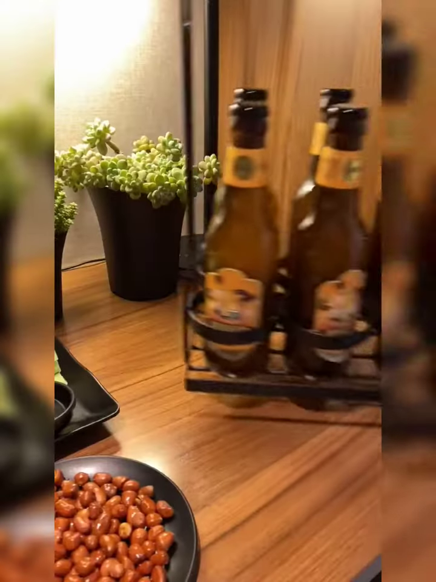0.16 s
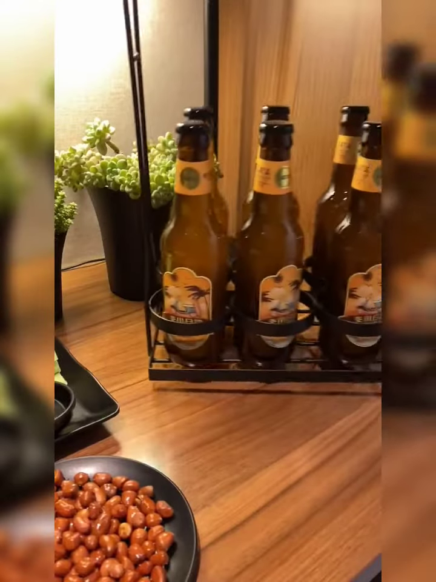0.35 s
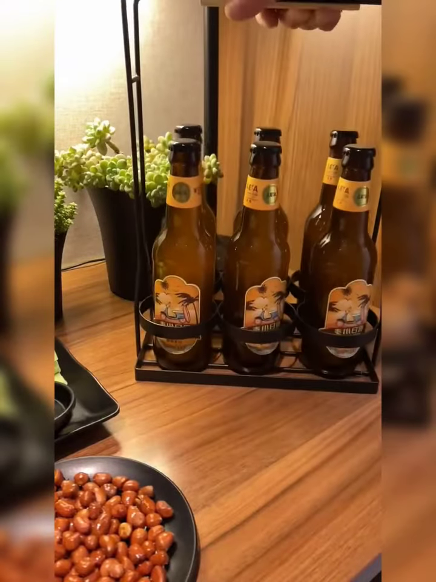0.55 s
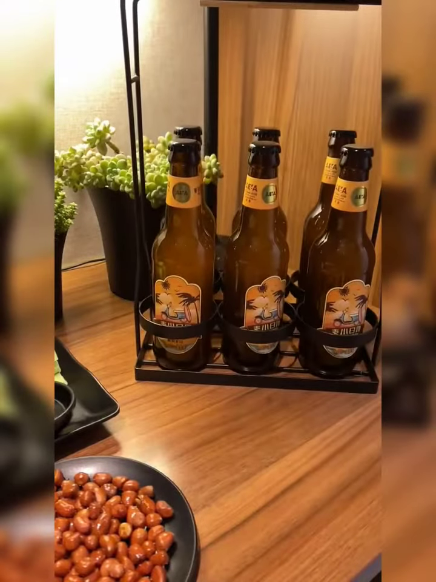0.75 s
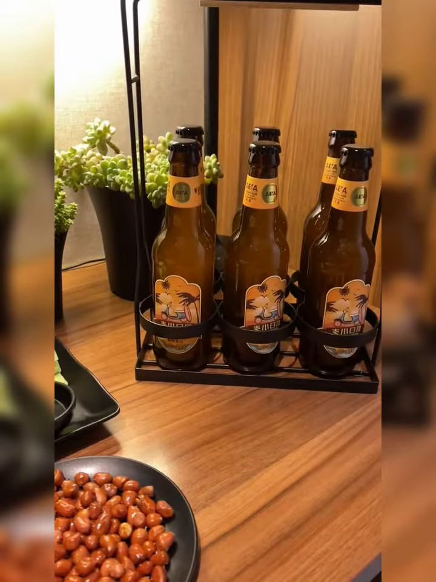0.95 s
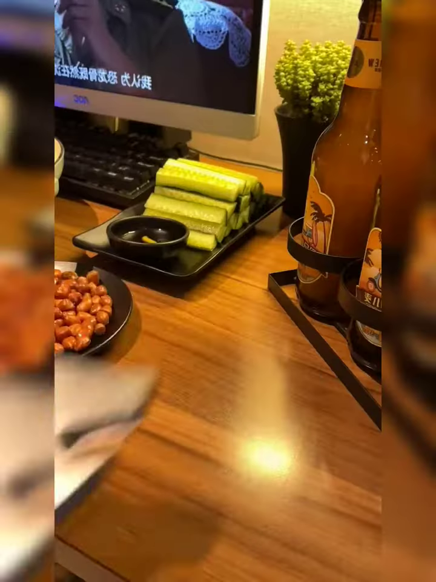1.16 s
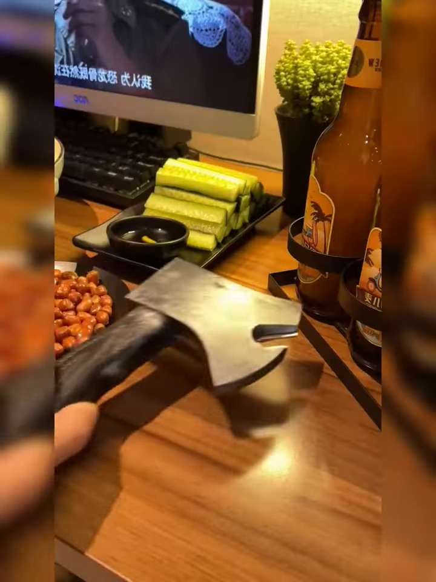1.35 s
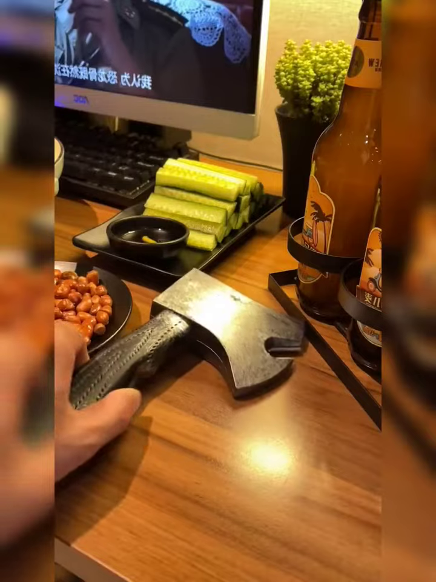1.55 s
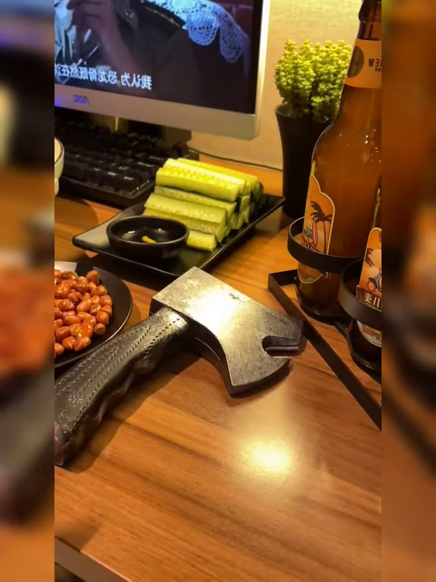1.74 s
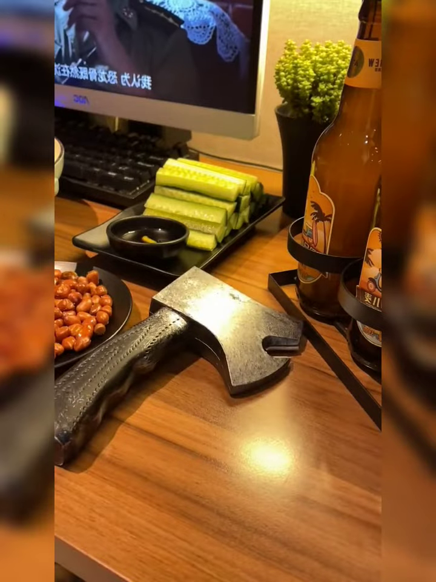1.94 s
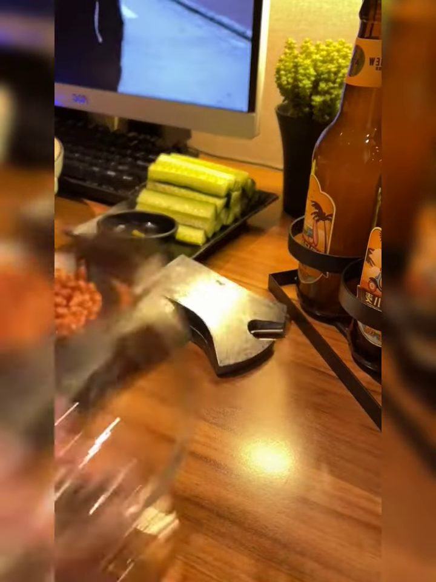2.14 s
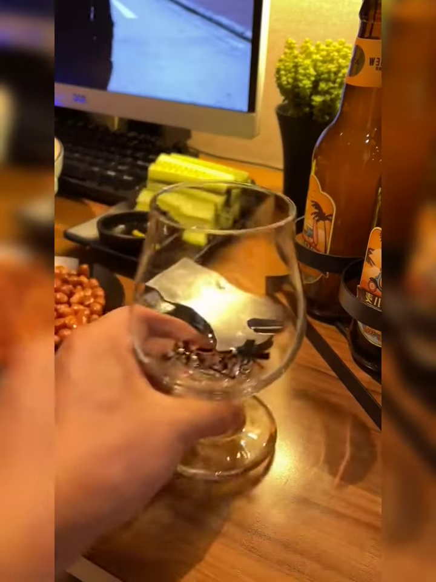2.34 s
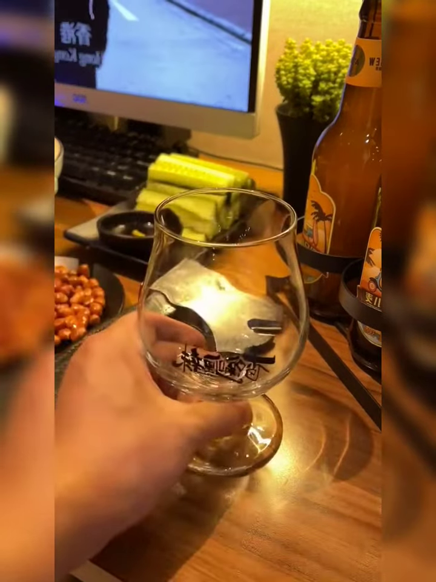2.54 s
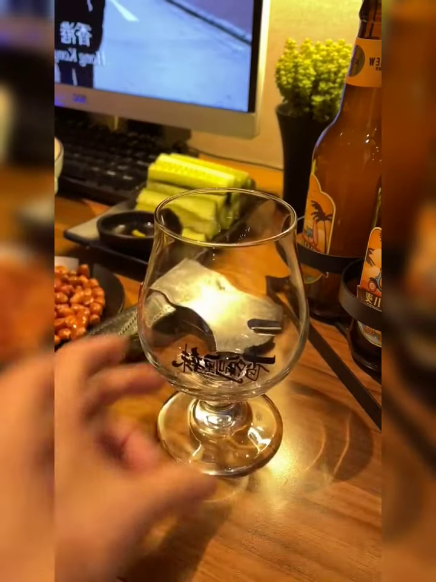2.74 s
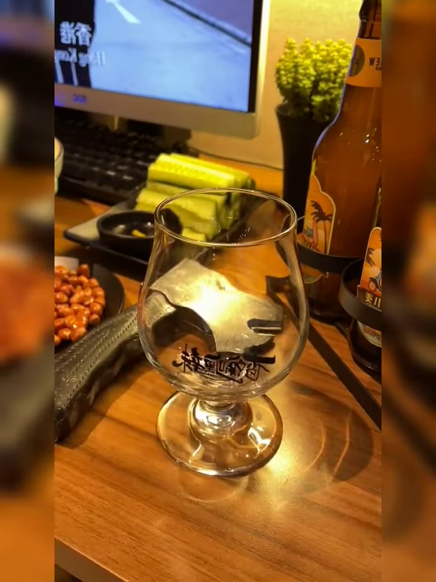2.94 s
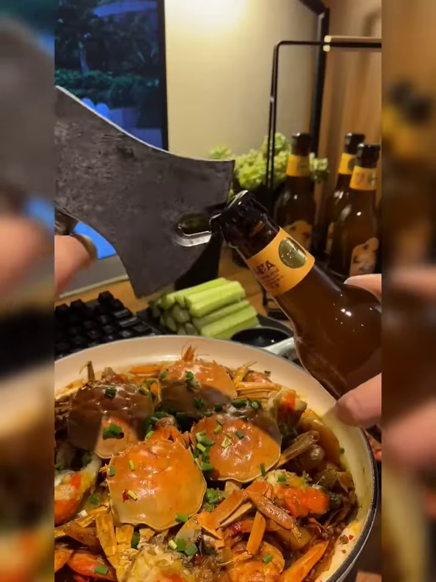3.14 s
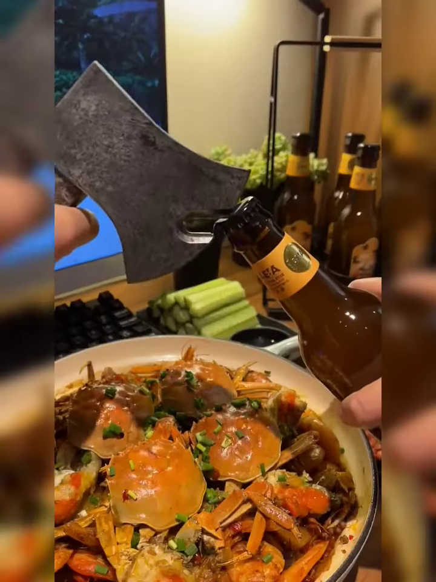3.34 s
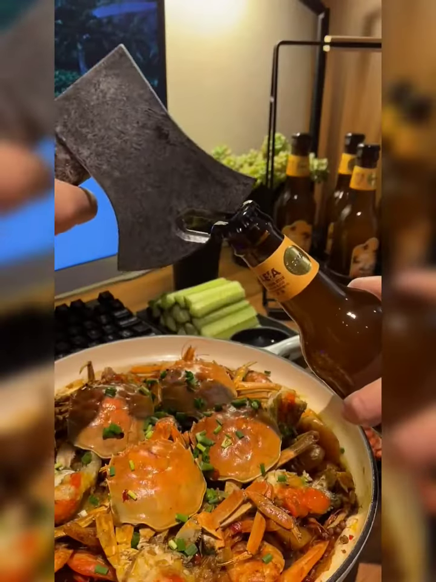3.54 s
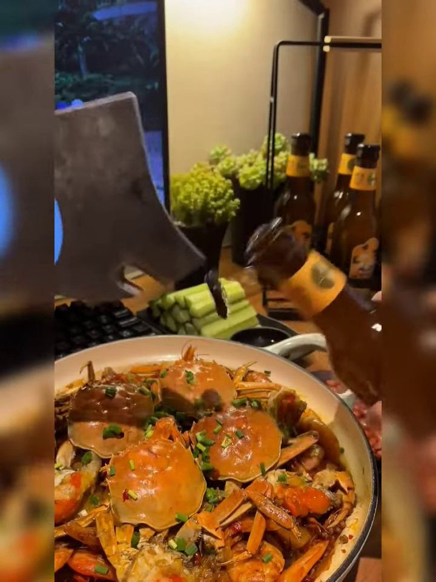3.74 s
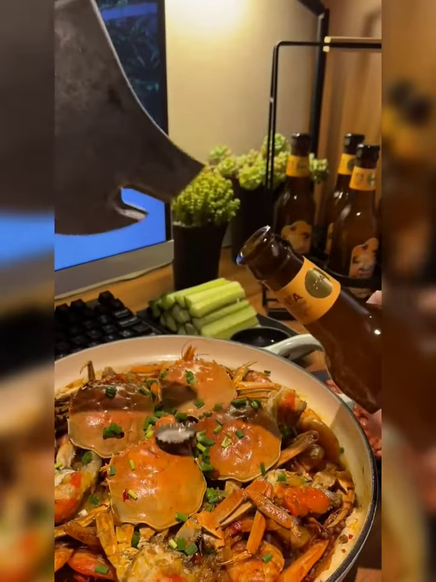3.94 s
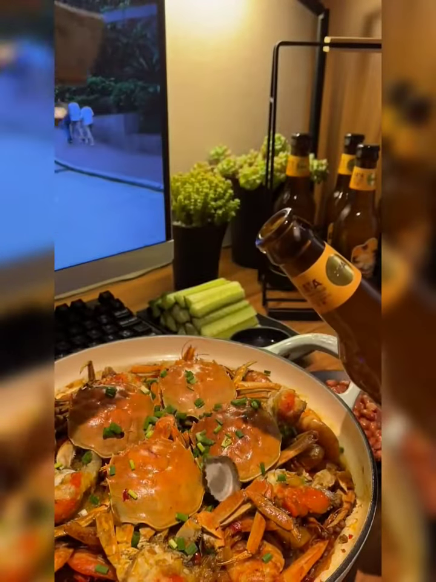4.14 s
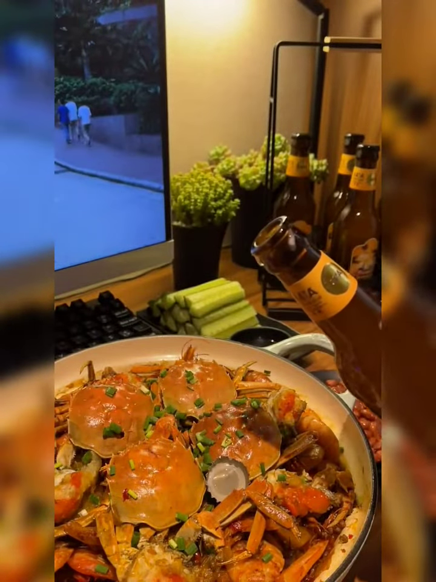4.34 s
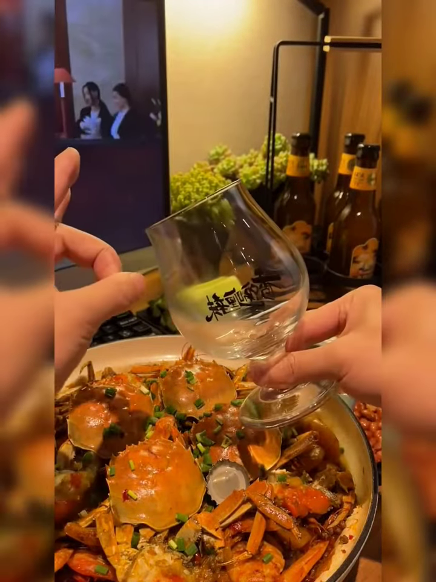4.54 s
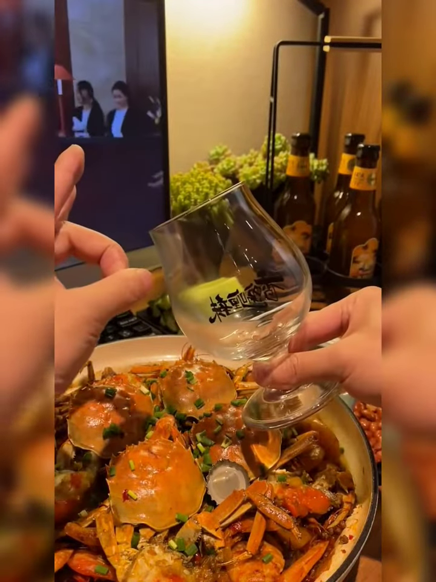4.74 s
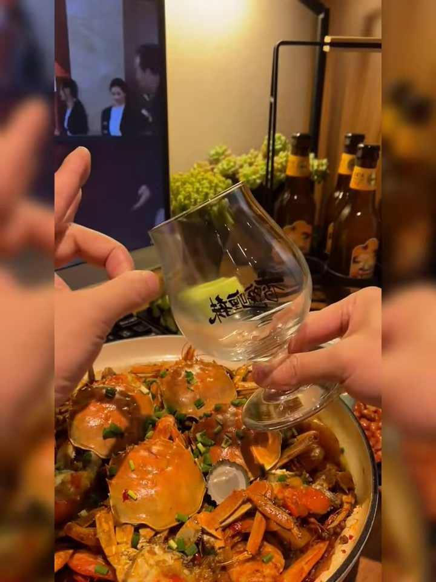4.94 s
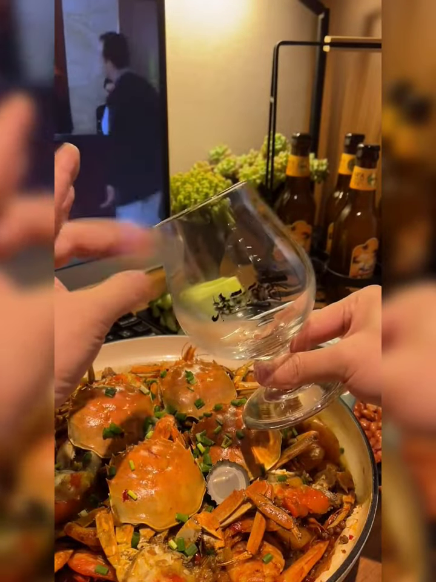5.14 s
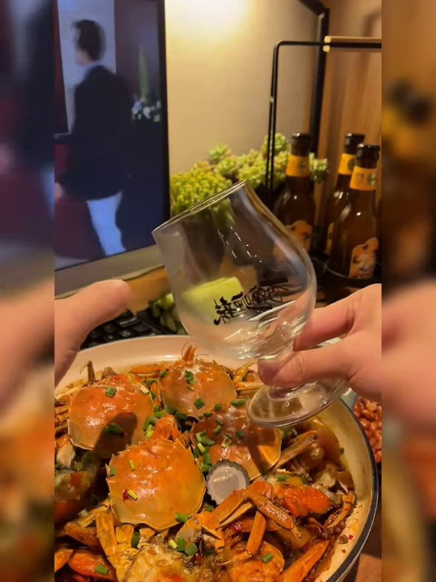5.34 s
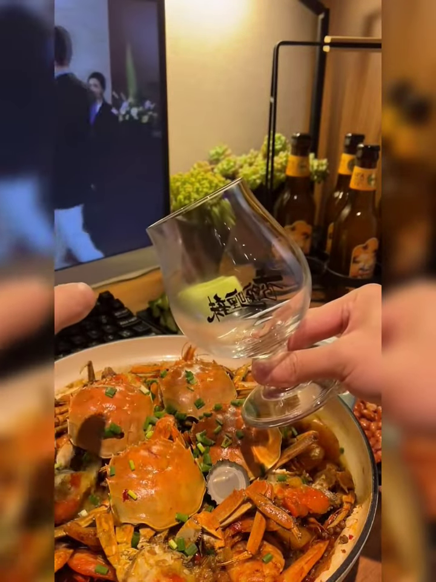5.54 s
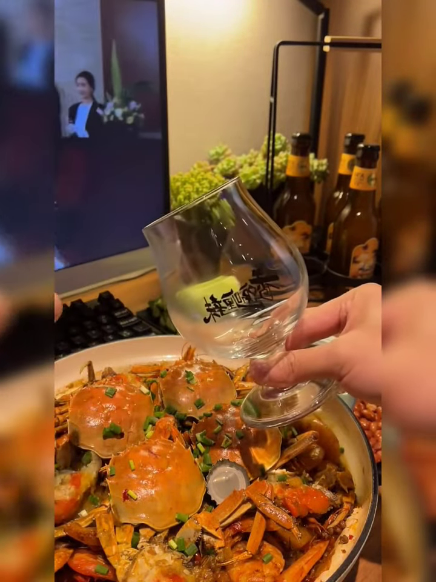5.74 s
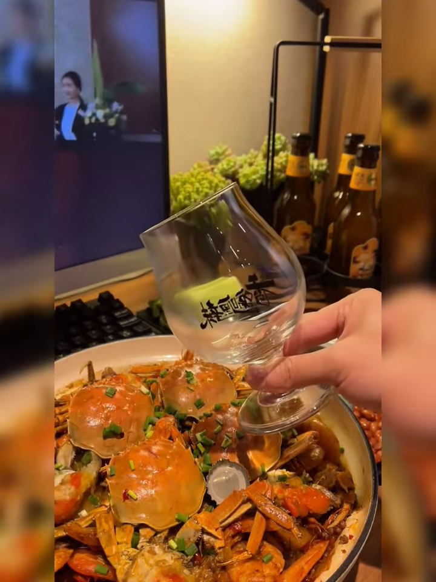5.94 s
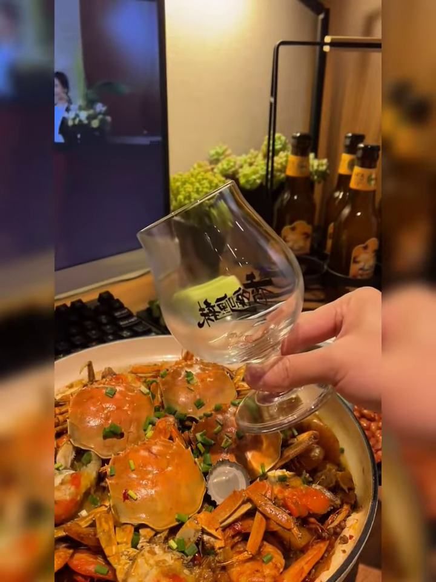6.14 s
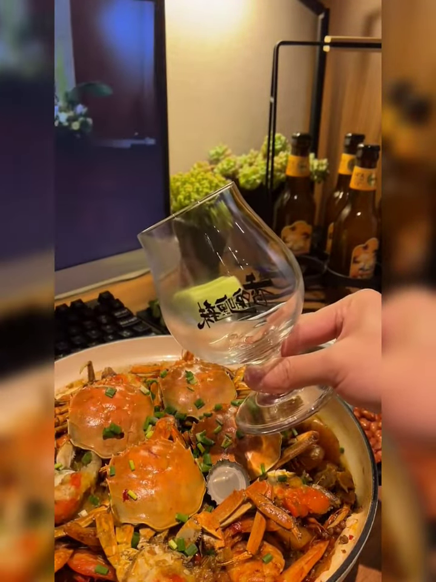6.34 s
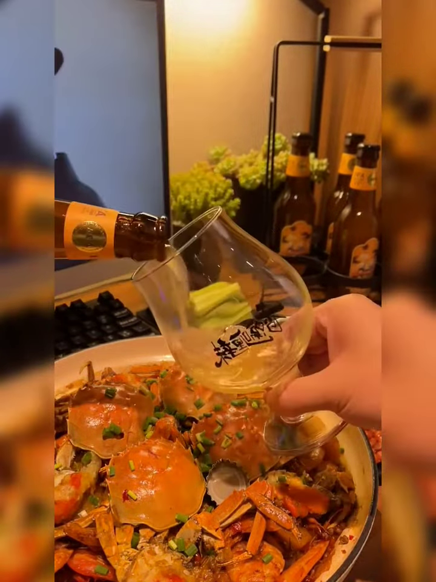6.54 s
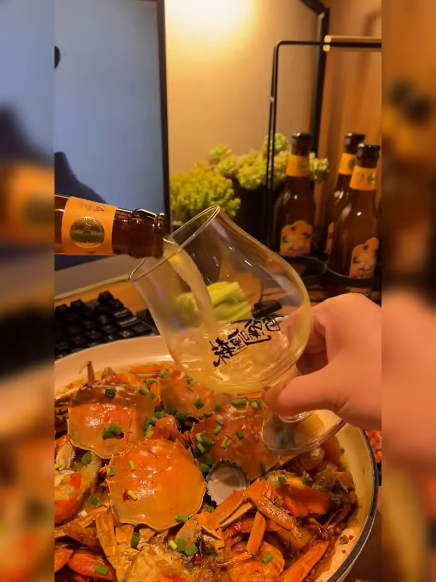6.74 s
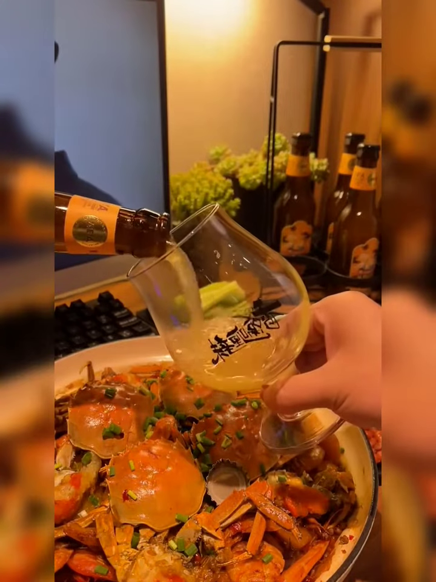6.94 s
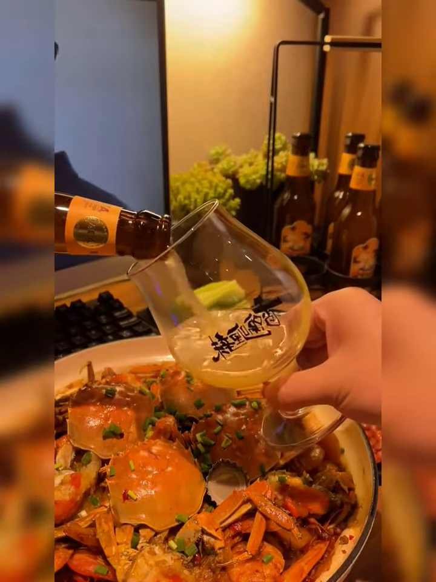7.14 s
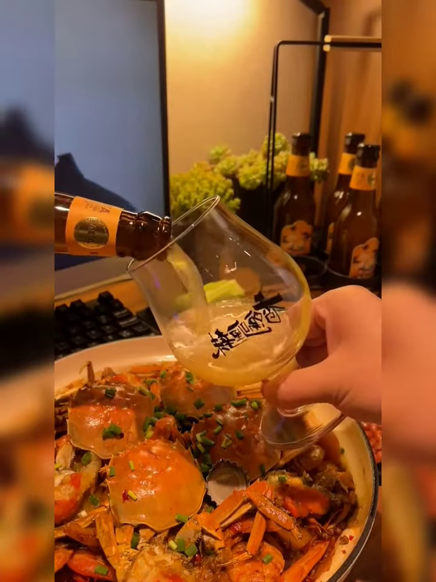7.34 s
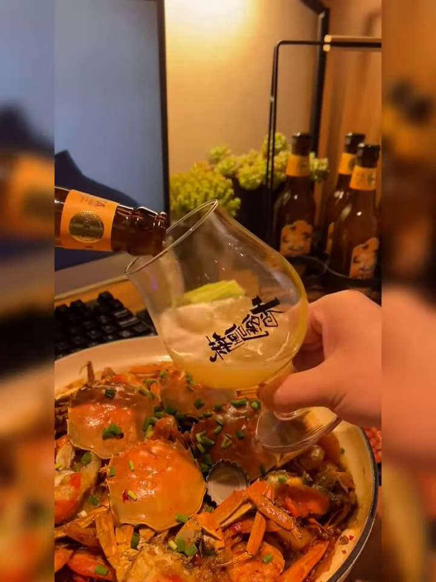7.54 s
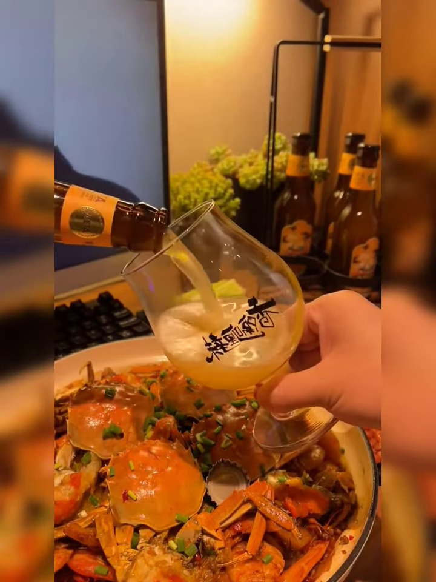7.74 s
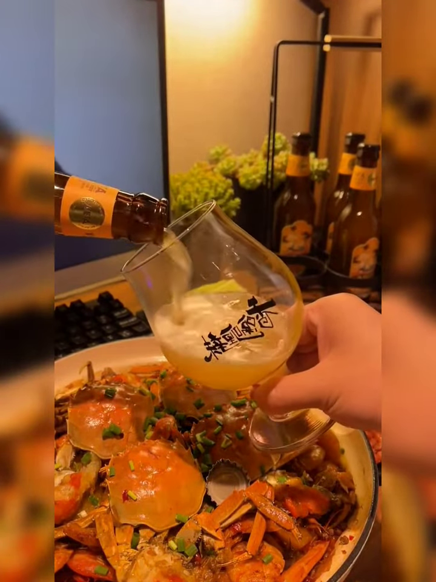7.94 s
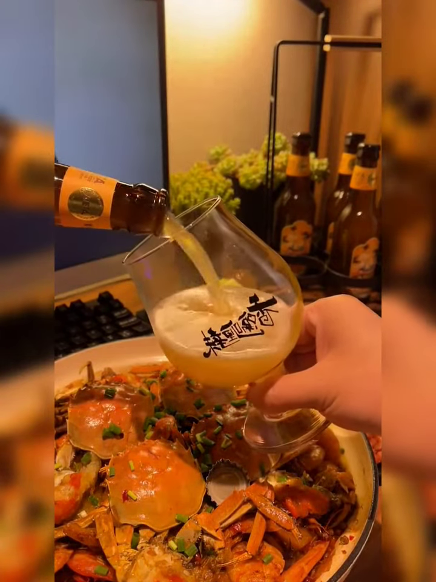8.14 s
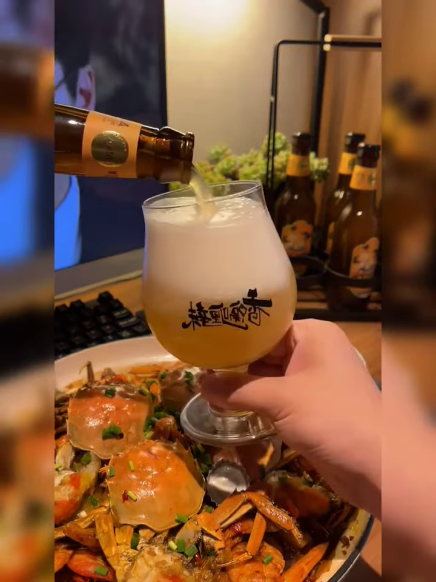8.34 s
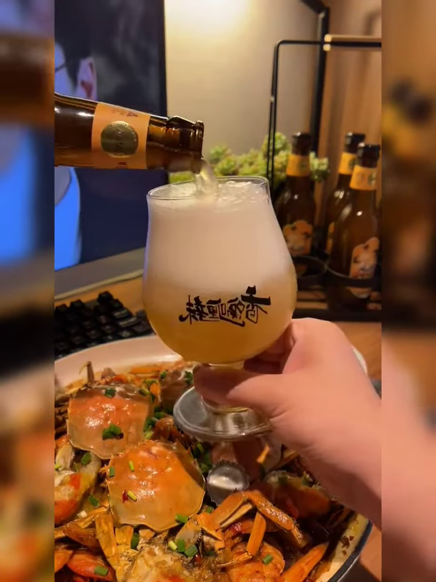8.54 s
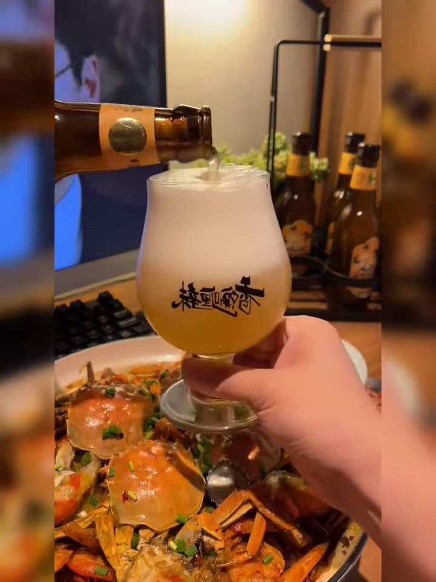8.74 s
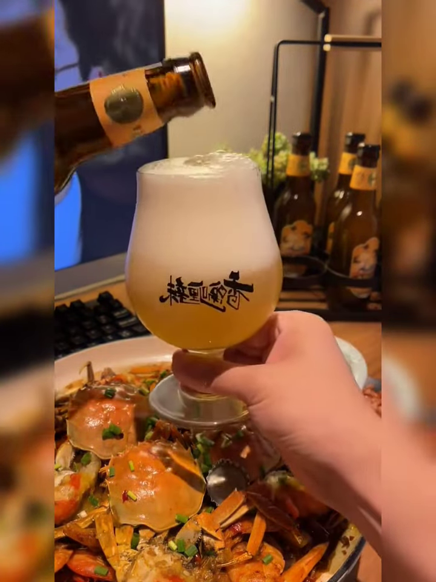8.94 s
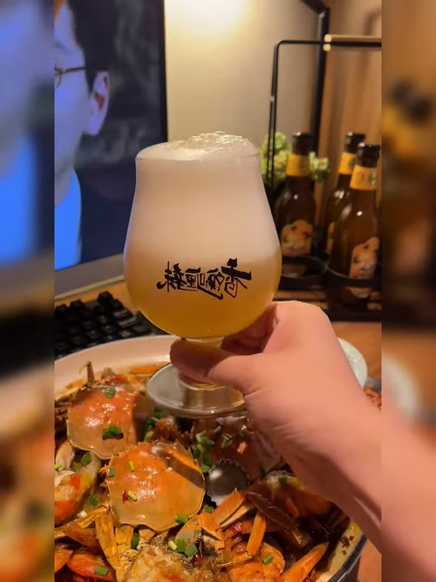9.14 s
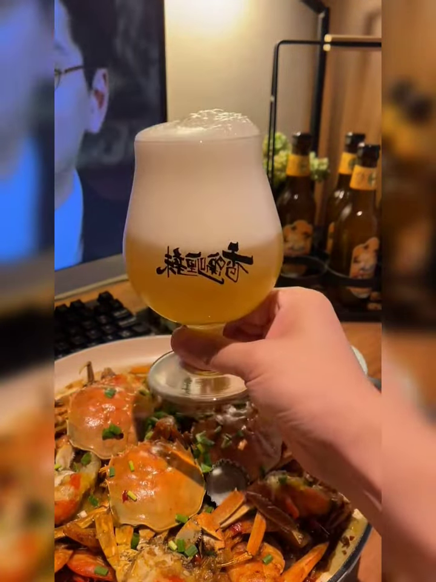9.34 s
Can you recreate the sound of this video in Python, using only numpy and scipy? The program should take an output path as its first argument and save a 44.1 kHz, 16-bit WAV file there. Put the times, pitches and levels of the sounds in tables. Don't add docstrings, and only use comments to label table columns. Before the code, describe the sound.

Dry close tabletop foley over low room rumble, with brief dips between scenes. Soft nudges precede a heavy rack thump and jingling bottles; later a metal blade knocks on wood and a glass foot taps down. A sharp gas spurt leads to a pop and bright tinny cap bounces. One loud glass ping fades while the background ducks, then uneven watery glugs, drops and fizz fill the bowl.

```python
import sys
import numpy as np
from scipy import signal
from scipy.fft import rfft, irfft, next_fast_len
from scipy.io import wavfile

SR = 44100
rng = np.random.default_rng(int(sys.argv[2]) if len(sys.argv) > 2 else 0)


def magnitude_from_level(level_db):
    exponent = np.asarray(level_db, float) / 20
    return 10 ** exponent


def int16_out(signal):
    q = np.round(np.clip(np.atleast_2d(signal).T, -1, 1) * 32767)
    wavfile.write(sys.argv[1], SR, q.astype(np.int16))


N = 418068

EDGES = 20 * 2 ** np.arange(0, 9.9, 1 / 3)
CENTRES = np.sqrt(EDGES[1:] * EDGES[:-1])

CUTS = [
    1.241,
    2.173,
    3.138,
    4.559,
    6.562,
]
# start_s, rumble_db, air_db
SHOTS = [
    (0, -59, -60),
    (1.241, -53, -59.5),
    (2.171, -54, -60.5),
    (3.137, -55.5, -61),
    (4.557, -51.5, -60),
    (6.563, -47.5, -58),
    (7.95, -44.5, -57.5),
    (8.415, -49, -58),
]
# pitch_hz, density_db (per Hz)
RUMBLE = [(12, -50), (22, -20), (49, -2), (97, 8), (166, -16.5), (226, 0), (300, -30), (660, -120)]
# pitch_hz, density_db (per Hz)
AIR = [(230, -1.5), (450, -9.5), (650, -21), (1260, -20.5), (2500, -28.5), (5000, -36), (9000, -31),
       (12500, -37.5), (13600, -54.5)]
# pitch_hz, level_db
DIFFUSE = [(100, -31), (200, -11.5), (380, -3), (700, 3), (1300, -8), (2400, -11), (6000, -8), (12000, -8)]
# pitch_hz, t60_s
ECHO = [(80, 0.29), (300, .55), (1000, 0.31), (3000, 0.18), (10000, 0.14)]
# pitch_hz, phase_half_turns
PORTS = [(0, 0), (400, -.08), (700, .2), (1300, .05), (3000, .17), (4200, .3), (4600, .45), (4950, 1),
         (5350, 1.7), (5700, 2), (6200, 2), (7700, 2.6), (8300, 2.92), (9450, 3.02), (9850, 4),
         (10600, 4.2), (11200, 5), (11800, 6), (13200, 6.1), (14500, 7), (22050, 7)]

# start_s, level_db
NUDGES = [
    (.001, -36),
    (.0245, -27),
    (.0575, -31),
    (1.49, -41.5),
]
# start_s, held_s, level_db, heft_db, edge_db
JOLTS = [(0.0, 0.017, -55, -5.5, -10.5), (0.6, .1, -26.5, 2.5, -4), (0.7449, 0.16, -33.5, 4.5, -14.5),
         (.898, 0.021, -32.5, -0.5, -13), (1.592, 0.023, -56, -5.5, 6.5), (2.5, 0.041, -62, -8.5, 2.5),
         (1.64, 0.025, -25.5, -6.5, -5), (2.5, 0.02, -33, 2, -26), (1.8, .03, -44.5, -7.5, -5),
         (1.65, .06, -50.5, -8.5, -13), (0.3, 0.033, -58.5, -5, -12)]
JOLT_RISE_S = 0.018
SETTLE_DB_PER_S = (195, 423, 516.5)
AFTER_DB, AFTER_DB_PER_S = (-13.5, -14.5, -28), (63.5, 93, 202.5)
# start_s, thud_db, knock_db, tick_db
KNOCKS = [
    (0.594, -28, -9.5, -23),
    (0.63, -24, -16.5, -32.5),
    (0.901, -28, -17.5, -52.5),
    (1.614, -30, -34.5, -50),
    (1.624, -57, -13.5, -29.5),
    (1.641, -63, -29, -38),
]
# start_s, knock_db, clack_db, tick_db
FOOT = [
    (2.466, -6, -21, -18),
    (2.486, -14, -40.5, -52),
]
# pitch_hz, density_db (per Hz)
WOOD = [(60, -12.5), (120, 7), (500, 1.5), (1000, -6), (2000, -17.5), (6000, -36.5), (12000, -31),
        (15500, -36.5)]
# pitch_hz, level_db, t60_s
TABLE = [(91, 1.5, 0.2), (142, -6, 1.2), (527.2, 2, 0.26), (813, -8, 0.27), (1200, -4, 0.63),
         (1632, -17.5, 0.18)]
# pitch_hz, level_db, t60_s
RACK = [(2337, -35, 0.75), (2405, -36, 0.6), (2336, -22, 0.043), (3760, -38, 0.12), (4360, -36.5, 0.083),
        (7194, -39.5, 0.1), (1260, -33, 0.091)]
# start_s, level_db
RINGS = [
    (.596, 6),
    (.635, 0.5),
    (.68, -4.5),
    (.728, -7.5),
    (.902, -20.5),
    (1.755, -31),
]
# pitch_hz, level_db, t60_s
BOTTLES = [(1123, -1.5, .06), (1294, -1, 0.093), (1520, -3.5, .04), (1770, -5, .06), (2120, -8.5, 0.14),
           (2280, -6, 0.045), (2600, -8.5, .07), (3200, -12, .04), (3720, -11.5, .06), (4320, -12.5, .05),
           (4700, -15.5, .04), (5160, -13, 0.056), (6360, -16, 0.034)]
# pitch_hz, level_db, t60_s
TRAY = [(543, -1, 0.046), (1090, -11, .05), (1325, -7, 0.059), (1520, -17, 0.07), (2880, -27, .04),
        (3555, -21, .03)]
# start_s, rise_s, held_s, level_db, fall_db_per_s
CHATTER = [
    (.631, .008, .018, -28, 300),
    (.668, .02, .035, -27.5, 400),
]
# start_s, rise_s, held_s, level_db, fall_db_per_s
BUZZ = [
    (.8, .08, .085, -35, 900),
    (.902, .003, .035, -24.5, 400),
]
# start_s, level_db, pitch_hz
FLEXES = [(.598, -10, 272), (.901, -19, 585), (1.625, -13, 1000), (1.63, -17.5, 304.6), (1.657, -21, 800),
          (2.466, -12, 1302), (2.472, -20, 800), (2.484, -16, 1000), (2.489, -18.5, 1500),
          (2.492, -15.5, 850), (2.504, -24.5, 800), (2.515, -27.5, 600), (2.53, -29.5, 330),
          (3.757, -21.5, 270)]
# start_s, level_db, pitch_hz
BLADE = [
    (1.626, -31, 3860),
    (1.639, -19.5, 3880),
    (1.665, -35, 3320),
]

# start_s, level_db, loss_db_per_s, twin_share, beat_peak_s
STRIKES = [
    (2.53, -52.5, 30, 0.86, 2.86),
    (5.256, -1.0, 40.0, 0.17, 5.59),
    (6.98, -41, 219, 0.14, 2.9),
]
BOWL_HZ, BEAT_HZ = 1188.5, 3.45
# start_s, clack_db, ring_db, edge_db
FLICK = [
    (5.254, -9, -34.5, -18.5),
]
# pitch_hz, level_db, t60_s
BOWL = [(3060, -17, 0.41), (3030, -30, 0.25), (2397, -56.5, 0.67), (5630, -2.5, 0.017), (5640, -28.5, 0.11),
        (3833, -45, .17), (1260, -9.5, 0.0053), (7004, -46, .09), (8200, -26.5, 0.072), (9600, -34.5, 0.12),
        (11100, -35.5, .14)]
DUCK_DB, DUCK_RECOVER_S, DUCK_LINGER = 21.0, 0.25, 1.5
DUCK_RUMBLE_SHARE, DUCK_ROOM_SHARE = 0.6, 0.94

# start_s, rise_s, held_s, level_db, fall_db_per_s
LEAKS = [
    (2.78, .12, .055, -50.5, 699),
    (3.174, .016, .122, -21, 1505),
    (3.176, .005, .006, -27.5, 909),
    (3.299, .01, .01, -46, 232),
    (3.756, .006, .03, -25.5, 414.5),
    (4.25, .01, .3, -64.5, 903.5),
]
# pitch_hz, density_db (per Hz)
GAS = [(300, -30), (2000, -20), (5000, -16.5), (6500, -9), (7700, -3), (9500, 3), (12000, 5), (13500, -11),
       (15500, -17)]
# start_s, clack_db, ring_db, edge_db
BOUNCES = [(3.754, -10.5, -16, -23), (3.766, -19, -14, -27), (3.799, -25.5, -21, -32),
           (3.804, -28, -14.5, -27), (3.92, -18, -21, -24), (3.932, -26.5, -21, -23),
           (4.022, -25.5, -37.5, -39.5), (4.041, -16.5, -21.5, -34), (4.067, -27.5, -54.5, -47.5),
           (4.14, -16, -21, -12), (4.203, -16, -29, -46.5), (4.221, -21.5, -27, -32.5),
           (4.235, -22, -12.5, -26), (4.302, -30, -46, -48.5), (4.317, -26, -56.5, -45)]
# pitch_hz, density_db (per Hz)
TIN = [(500, -30), (1000, -9), (2500, -4.5), (6300, 5), (8000, -1.5), (10000, 1.5), (13500, -15),
       (15500, -22)]
# pitch_hz, level_db, t60_s
CAP = [(1055, -37.5, 0.05), (800, -26, 0.02), (2500, -21, 0.038), (3050, -17, 0.014), (3950, -21.5, .03),
       (5478, -16, 0.044), (6290, -6.5, 0.033), (7130, -13.5, .04), (10030, -8, .03), (10820, -9, 0.038),
       (12170, -13, 0.034)]
# pitch_hz, level_db, t60_s
NECK = [(131, -18, 0.14), (252, -15.5, 0.068), (1210, -20.5, 0.15)]
# start_s, level_db, pitch_hz
CLACKS = [(3.754, -15.5, 2500), (3.757, -22.5, 1080), (3.764, -19, 2600), (3.801, -24.5, 1050),
          (3.803, -19.5, 3280), (3.92, -15, 1565), (3.933, -23, 1790), (3.955, -31, 1500),
          (4.021, -24, 2080), (4.036, -25, 2600), (4.04, -15, 2510), (4.042, -24.5, 1196),
          (4.066, -37, 1700), (4.075, -32, 1110), (4.103, -32, 2020), (4.14, -14, 2554),
          (4.143, -31.5, 970), (4.155, -34, 2290), (4.203, -13.5, 2020), (4.222, -14.5, 2130),
          (4.236, -17, 2500), (4.262, -34, 2200), (4.285, -31.5, 2120), (4.303, -29, 2000),
          (4.317, -23.5, 2090)]
# pitch_hz, level_db, t60_s
DISH = [(1550, -3, .03), (1904, -1.5, 0.026), (2245, -1, .04), (2570, -4, .05)]
# start_s, rise_s, held_s, level_db, fall_db_per_s
ROLL = [
    (4.245, .01, .075, -37, 900),
]

# start_s, level_db
STREAM = [
    (6.565, -64.5),
    (6.7, -58),
    (6.97, -49),
    (7.3, -47.5),
    (7.5, -53),
    (8.05, -60),
    (8.3, -55.5),
    (8.39, -41.5),
    (8.415, -67),
]
# start_s, peak_db, pitch_hz, gulp_db
GLUGS = [(6.82, -36.5, 700, -34), (6.979, -43.5, 790, -62), (7.086, -40.5, 760, -58),
         (7.114, -24.5, 765, -38), (7.16, -31.5, 694, -29), (7.225, -37, 760, -60), (7.27, -28.5, 810, -55),
         (7.288, -25.5, 785, -50), (7.312, -20.5, 700, -40), (7.393, -37, 910, -60), (7.405, -22, 758, -50),
         (7.425, -34, 720, -55), (7.455, -29, 694, -45), (7.504, -36.5, 710, -32.5),
         (7.636, -24.5, 760, -49), (7.652, -36.5, 714, -50), (7.755, -22.5, 700, -42),
         (7.775, -37, 640, -49), (7.809, -37, 740, -48), (7.846, -37, 640, -43), (7.877, -36, 764, -39),
         (7.993, -42.5, 664, -52), (8.069, -40, 833, -58), (8.146, -23.5, 713, -24.5),
         (8.163, -32, 852, -28.5), (8.207, -35, 770, -35.5), (8.237, -37.5, 700, -33),
         (8.287, -32.5, 800, -50), (8.345, -39, 800, -55), (8.365, -35.5, 813, -48),
         (8.387, -37.5, 1066, -55), (8.403, -46, 910, -62)]
# start_s, peak_db, pitch_hz, spray_db
DROPS = [(6.575, -26.5, 3870, -42.5), (6.757, -42.5, 2800, -52.5), (6.612, -43, 2920, -38),
         (6.708, -50, 3760, -54), (6.801, -46, 6140, -58), (6.821, -40.5, 2530, -32.5),
         (6.853, -49, 3030, -59), (6.872, -43, 2850, -45.5), (6.915, -47, 2690, -48),
         (6.882, -34.5, 2800, -56), (6.961, -45, 6400, -29), (6.977, -20.5, 2684, -28),
         (7.0636, -32, 2910, -43), (7.086, -37, 2520, -52), (7.1135, -55, 2680, -30.5),
         (7.202, -46, 2500, -55), (7.25, -46, 2900, -45.5), (7.29, -41, 2710, -46), (7.393, -44, 2500, -69),
         (7.1606, -41.5, 4220, -49), (7.276, -38, 2500, -43), (7.3084, -37, 2500, -30),
         (7.412, -38, 2960, -74), (7.453, -32.5, 2490, -73), (7.5034, -36.5, 2650, -43),
         (7.6375, -42.5, 2530, -47), (7.534, -51, 2600, -56), (7.554, -51, 2520, -68),
         (7.65, -51, 6400, -44.5), (7.729, -43, 2480, -53), (7.785, -57, 2500, -45),
         (7.846, -46, 3040, -53), (7.905, -44.5, 3200, -64), (7.943, -47, 3440, -64.5),
         (7.7535, -42, 2450, -46), (7.81, -68, 2540, -46), (7.881, -37.5, 5480, -55),
         (8.025, -26, 2470, -96), (8.067, -39, 2460, -43), (8.148, -43, 2460, -50),
         (8.239, -50, 5500, -60.5), (8.265, -46, 3820, -62), (8.272, -34.5, 2970, -70),
         (8.384, -55.5, 2600, -48)]
# pitch_hz, density_db (per Hz)
SPRAY = [(400, -27), (1200, -4.5), (1900, -68), (2700, 3), (3600, -2.5), (7000, -4.5), (11000, -6.5),
         (15000, -19)]
# pitch_hz, width_hz, level_db
CAVITY = [(700, 81, -12), (800, 220, -3), (2566, 97, 6), (2770, 450, -18), (2950, 56, 2.5)]
# start_s, rise_s, held_s, level_db, fall_db_per_s
FIRST_SPLASH = (1.5, 0.6, .01, -41, 300.5)
# rise_s, held_s, level_db, fall_db_per_s
SURGE = (.006, .035, 6, 250)
POOL_S, POOL_FILLS_S, DRY_DB, SLOSH_DB = 7.5, 0.38, -14, 3
FIZZ_DB, FIZZ_FOLLOWS = -53.5, 0.86
POUR_PAN_DB = -2.0


def at_hz(points, hz):
    points = np.array(points)
    return np.interp(np.log(hz), np.log(points[:, 0]), points[:, 1])


def in_time(rows):
    return np.interp(np.arange(N) / SR, *np.transpose(rows), -200, -200)


def drift(hz, size=N):
    knots = rng.standard_normal(1200)
    return np.interp(np.arange(size) * hz / SR % 1199, np.arange(1200), knots)


def band(x, order, low_hz, high_hz):
    return signal.sosfilt(signal.butter(order, [low_hz, high_hz], "band", fs=SR, output="sos"), x)


def dull(x, hz):
    return signal.sosfilt(signal.butter(8, hz, fs=SR, output="sos"), x)


def split(x):
    return np.array([band(x + 1e-18, 2, low, high) for low, high in zip(EDGES, EDGES[1:])])


def coloured(spectrum, low_hz, high_hz, x):
    hz = np.fft.rfftfreq(len(x), 1 / SR) + 1
    shaped = rfft(x) * magnitude_from_level(at_hz(spectrum, hz))
    inside = (hz > low_hz) & (hz < high_hz)
    return irfft(shaped, len(x)) * len(x) / np.sqrt(2 * np.sum(np.abs(shaped[inside]) ** 2))


def patches(hz, spread_db, size):
    own = np.repeat([drift(hz, size) for k in range(10)], 3, axis=0)[:len(CENTRES)]
    return magnitude_from_level(spread_db * (own + 0.8 * drift(hz, size)))


def swell(s, rise_s, held_s, db, fall_db_per_s):
    out, first = np.zeros(N), max(int((s - 0.2) * SR), 0)
    t = np.arange(first, first + SR) / SR - s
    climb = np.maximum(-40 * t / rise_s, 0)
    fall = np.maximum(fall_db_per_s * (t - held_s), 0)
    out[first:first + SR] = magnitude_from_level(db - climb - fall)
    return out


def grit(per_s, spread_db):
    hits = (rng.random(N) < per_s / SR) * rng.standard_normal(N)
    return hits * magnitude_from_level(spread_db * np.minimum(rng.exponential(1, N), 4))


def ring(clicks, hz, t60):
    r, w = magnitude_from_level(-60 / (t60 * SR)), 2 * np.pi * hz / SR
    return signal.lfilter([0, np.sin(w)], [1, -2 * r * np.cos(w), r * r], clicks + 1e-18)


def struck(rows, modes, db, scatter_db):
    rows, out = np.array(rows), np.zeros(N)
    at = (rows[:, 0] * SR).astype(int)
    luck = rng.standard_normal((len(rows), len(modes)))
    for (hz, mode_db, t60), chance in zip(modes, luck.T):
        clicks = np.zeros(N)
        clicks[at] = magnitude_from_level(rows[:, 1] + mode_db + db + scatter_db * chance)
        out += ring(clicks, hz, t60)
    return out


def cracks(rows, spectrum, marks_hz, snap_db, tail_db, low_ms, high_ms, lumpy_db):
    out, size, half = np.zeros(N), 4500, 200
    t = np.arange(size)[None, :] / SR
    burst = split(rng.standard_normal((len(rows), size)))
    t60 = np.geomspace(low_ms, high_ms, len(CENTRES))[:, None] / 1000
    dying = magnitude_from_level(-60 * t / t60)
    hz = np.fft.rfftfreq(2 * half, 1 / SR) + 1
    push_pull = 1j / (1 + (450 / hz) ** 2) / (1 + (hz / 9000) ** 2)
    for k, (s, *levels) in enumerate(rows):
        correction = list(zip(marks_hz, at_hz(spectrum, marks_hz) - levels))
        colour = at_hz(spectrum, CENTRES) - at_hz(correction, CENTRES)
        at = int(s * SR)
        tail = magnitude_from_level(colour + tail_db) @ (patches(230, lumpy_db, size) * burst[:, k] * dying)
        out[at:at + size] += tail
        out[at - 2 * half:at] += magnitude_from_level(-17) * tail[2 * half:0:-1] * np.linspace(0, 1, 2 * half)
        pulse = irfft(push_pull * magnitude_from_level(snap_db + at_hz(list(zip(CENTRES, colour)), hz)))
        out[at - half + 40:at + half + 40] += np.roll(pulse, half) * np.hanning(2 * half)
    return out


def bubbles(rows, t60, rise, onset_ms):
    out, t = np.zeros(N), np.arange(3000) / SR
    for s, db, hz in rows:
        tone = np.sin(2 * np.pi * hz * t * (1 + rise * t / t60))
        shape = magnitude_from_level(db - 60 * t / t60) * (1 - np.exp(-t * 1000 / onset_ms))
        out[int(s * SR):int(s * SR) + len(t)] += tone * shape
    return out


def rattle(modes, rows, per_s):
    size = 5 * SR
    gain = sum(swell(*row) for row in rows)[:size]
    hits = (rng.random(size) < per_s / SR) * magnitude_from_level(3.3 * np.minimum(rng.exponential(1, size), 4))
    hits = hits / hits.std() * gain
    out = sum(magnitude_from_level(db - 27.5) * ring(hits * rng.standard_normal(size), hz, t60) for hz, db, t60 in modes)
    return np.pad(out, (0, N - size))


def ducking():
    t = np.arange(N) / SR - FLICK[0][0]
    return -DUCK_DB * np.exp(-np.abs(t / DUCK_RECOVER_S) ** DUCK_LINGER) * (t > 0)


def room_gains():
    s, *levels = np.transpose(SHOTS)
    shot = np.searchsorted(s, np.arange(N) / SR, "right") - 1
    sinking = [[DUCK_RUMBLE_SHARE], [DUCK_ROOM_SHARE]] * ducking()
    return magnitude_from_level(np.array(levels)[:, shot] + sinking)


def room_tone(rumble, air):
    tone = rumble * magnitude_from_level(2 * drift(4.4)) * coloured(RUMBLE, 30, 300, rng.standard_normal(N))
    return tone + air * magnitude_from_level(2.0 * drift(3.3)) * coloured(AIR, 160, 720, rng.standard_normal(N))


def shaking_gain(k):
    gain = np.zeros(N)
    for s, held_s, db, heft, edge in JOLTS:
        part_db = db + (heft, 0, edge)[k]
        gain += swell(s, JOLT_RISE_S, held_s, part_db, SETTLE_DB_PER_S[k])
        gain += swell(s, JOLT_RISE_S, held_s, part_db + AFTER_DB[k], AFTER_DB_PER_S[k])
    return gain


def table_shaking():
    contacts = grit(1500, spread_db=2.0)
    booming = sum(magnitude_from_level(db) * ring(contacts, hz, min(t60, 0.25)) for hz, db, t60 in TABLE)
    jingle = sum(ring(grit(300, spread_db=1), hz, 0.04) / hz ** 0.7 for hz in np.geomspace(1100, 7500, 16))
    body = coloured(WOOD, 330, 670, contacts)
    body += magnitude_from_level(-1.5) * booming / booming.std() + magnitude_from_level(-12.5) * jingle / jingle.std()
    shaking = np.zeros(N)
    for k, (low_hz, high_hz) in enumerate([(60, 330), (300, 2900), (2000, 22000)]):
        part = band(body, 2, low_hz, high_hz)
        shaking += shaking_gain(k) * part / part.std()
    return dull(shaking, 11800)


def table_blows():
    nudges = dull(struck(NUDGES, [(70.03, -6, 0.11), (98, 2, 0.089)], 0, scatter_db=0), 300)
    tink = struck([(0.376, -58)], [(2000, 3, 0.05), (2340, -6, 0.1), (5200, -8, 0.04)], 0, scatter_db=0)
    blows = cracks(KNOCKS, WOOD, [130, 700, 5000], 28, 10.5, low_ms=81, high_ms=33, lumpy_db=5.0)
    foot = [(100, -25), (600, 3), (1500, -0.5), (3000, -8), (15500, -8)]  # pitch_hz, density_db
    blows += cracks(FOOT, foot, [1200, 3200, 9000], 29, 5.0, low_ms=130, high_ms=22, lumpy_db=4.0)
    wires = struck(RINGS[:-1], RACK[2:], 0, scatter_db=2.0)
    wires += struck(RINGS[3:], RACK[:2], 0, scatter_db=1.0)
    return nudges + tink + dull(blows, 13000) + wires


def rack_rattle():
    return rattle(BOTTLES, CHATTER, 500) + rattle(TRAY, BUZZ, 280)


def table_flexes():
    return bubbles(FLEXES, 0.031, rise=-0.26, onset_ms=0.8)


def cleaver():
    return bubbles(BLADE, 0.02, rise=-0.03, onset_ms=0.5)


def singing():
    t, level = np.arange(N) / SR, 0
    for s, db, loss_db, share, peak_s in STRIKES:
        end = min([c for c in CUTS if c > s] + [N / SR])
        beat = np.abs(1 + share * np.exp(2j * np.pi * BEAT_HZ * (t - peak_s)))
        level = level + magnitude_from_level(db - loss_db * np.abs(t - s)) * beat * (t > s) * (t < end)
    return np.sqrt(2) * level * magnitude_from_level(ducking()) * np.sin(2 * np.pi * BOWL_HZ * t)


def glass():
    tick = cracks(FLICK, TIN, [1200, 5600, 11000], 34, 2.5, low_ms=110, high_ms=30, lumpy_db=4.0)
    upper = struck([(FLICK[0][0], -9)], BOWL, 0, scatter_db=0)
    return singing() + tick + upper * magnitude_from_level(ducking() + DUCK_DB)


def gas_leaks():
    gas = coloured(GAS, 8300, 13000, rng.standard_normal(N) * magnitude_from_level(2.3 * drift(300)))
    return sum(swell(*row) for row in LEAKS) * gas


def cap():
    hits = cracks(BOUNCES, TIN, [1800, 6300, 11000], 18.5, 3.7, low_ms=60, high_ms=40, lumpy_db=6.0)
    hits = signal.sosfilt(signal.butter(2, 700, "high", fs=SR, output="sos"), dull(hits, 15000))
    rows = np.array(BOUNCES)
    clinks = struck(rows[:, [0, 1]], CAP[:5], 0.9, scatter_db=7)
    clinks += struck(rows[:, [0, 2]], CAP[5:8], 0.51, scatter_db=4)
    clinks += struck(rows[:, [0, 3]], CAP[8:], 4.1, scatter_db=0.0)
    free_modes = [(6038, -24, 0.15), (6250, -22, 0.2), (6450, -21, 0.25), (10950, -23.0, 0.09)]
    free = struck([(BOUNCES[3][0], -12)], free_modes, 0, scatter_db=3.0)
    free += struck([(3.95, -43)], [(2500, 1, 0.3)], 0, scatter_db=1)
    return hits + clinks + free + struck(BOUNCES[:1], NECK, -3.5, scatter_db=3.0)


def cap_landings():
    notes = magnitude_from_level(2) * bubbles(CLACKS, 0.016, rise=-0.04, onset_ms=0.3)
    shriek = swell(3.806, rise_s=0.012, held_s=0.004, db=-11, fall_db_per_s=2500)
    shriek *= np.sin(2 * np.pi * 6300 * np.arange(N) / SR)
    return notes + shriek + rattle(DISH, ROLL, 400)


def stream_gains():
    flow_db, t = in_time(STREAM), np.arange(N) / SR
    dry = 1 / (1 + np.exp(np.clip((t - POOL_S) / POOL_FILLS_S * 2, -50, 50)))
    fizz_db = FIZZ_DB + FIZZ_FOLLOWS * (flow_db - np.max(flow_db))
    surges = 1 + sum(swell(row[0], *SURGE) for row in DROPS)
    slosh = magnitude_from_level(flow_db + SLOSH_DB + DRY_DB * dry)
    return slosh, magnitude_from_level(flow_db) * surges, magnitude_from_level(fizz_db) * surges + swell(*FIRST_SPLASH)


def swarm(low_hz, high_hz, count):
    when, size, pitch = rng.random((count, 3)).T
    start_s = STREAM[0][0] + when * (STREAM[-1][0] - STREAM[0][0])
    return np.transpose([start_s, -14 * size, low_hz * (high_hz / low_hz) ** pitch])


def cavity(x, modes):
    y = sum(magnitude_from_level(db) * width * ring(x, hz, 1.1 / width) for hz, width, db in modes)
    y = band(y, 3, 2250, 3400)
    return y / y.std()


def glugging(slosh):
    glugs = bubbles(np.array(GLUGS)[:, :3] * [1, 1, 0.93] + [0, 7, 0], 0.024, rise=0.12, onset_ms=1.08)
    glugs += magnitude_from_level(9.5) * slosh * bubbles(swarm(400, 1500, count=110), 0.036, rise=0.24, onset_ms=0.4)
    gulps = bubbles(np.array(GLUGS)[:, [0, 3, 2]] * [1, 1, 0.45], 0.04, rise=0.25, onset_ms=2.4)
    hum = sum(magnitude_from_level(db - 42.5) * ring(glugs, hz, 0.072) for hz, width, db in CAVITY[:2])
    loud = [(s, db - 5.5, db - 22.0, db - 46) for s, db, hz, gulp in GLUGS if db > -37]
    slaps = cracks(loud, SPRAY, [380, 1300, 6000], 24, 3.0, low_ms=98, high_ms=50, lumpy_db=6.5)
    return glugs + gulps + hum, slaps


def dripping(trickle):
    drops = bubbles(np.array(DROPS)[:, :3] + [0, 7, 0], 0.023, rise=0.06, onset_ms=2.5)
    drops += magnitude_from_level(-9.5) * trickle * bubbles(swarm(2280, 4600, count=420), 0.031, rise=0.015, onset_ms=1.0)
    rows = [(s, db - 31.0, db - 14.5, spray_db) for s, db, hz, spray_db in DROPS]
    spray = cracks(rows, SPRAY, [1300, 2700, 8500], 18.0, 6.75, low_ms=160, high_ms=87, lumpy_db=4.5)
    return drops, spray


def streaming(trickle, fizz):
    patchy = magnitude_from_level(7.0 * np.tanh(2 * drift(70)) - 24.0)
    stream = trickle * patchy * cavity(grit(2500, spread_db=2.5), CAVITY[2:])
    start, size = int(STREAM[0][0] * SR), 84000
    foam = split(coloured(SPRAY, 3800, 12000, grit(4000, spread_db=3.0))[:size])
    foam = foam * (CENTRES > 1000)[:, None] * patches(32, 7.7, size)
    stream[start:start + size] += fizz[start:start + size] * np.sum(foam, axis=0) * magnitude_from_level(-13.5)
    return stream


def pour():
    slosh, trickle, fizz = stream_gains()
    glugs, slaps = glugging(slosh)
    drops, spray = dripping(trickle)
    noisy = dull(slaps + spray + streaming(trickle, fizz), 11330)
    return (glugs + drops + noisy) * (np.arange(N) < STREAM[-1][0] * SR)


def echo(x):
    t = np.arange(24000) / SR
    dying = magnitude_from_level(-60 * t / at_hz(ECHO, CENTRES)[:, None])
    tail = np.sum(split(rng.standard_normal(len(t))) * dying, axis=0)
    tail = tail * np.minimum(t / 0.017, 1) / np.sqrt(np.sum(tail ** 2))
    return signal.fftconvolve(x, tail)[:N]


def ports(x):
    size = next_fast_len(N + 4096)
    half_turns = np.interp(np.fft.rfftfreq(size, 1 / SR), *np.transpose(PORTS))
    turn = np.exp(0.5j * np.pi * half_turns)
    spectrum = rfft(x, size)
    return np.array([irfft(spectrum * turn, size), irfft(spectrum / turn, size)])[:, :N]


def scene():
    rumble, air = room_gains()
    tone = room_tone(rumble, air)
    on_table = table_shaking() + table_blows() + rack_rattle() + table_flexes() + cleaver()
    ringing = glass()
    opening = gas_leaks() + cap() + cap_landings()
    beer = pour()
    things = on_table + opening + beer
    heard = np.arange(N) < STREAM[-1][0] * SR
    unlike = air * coloured(AIR, 180, 480, rng.standard_normal(N)) + magnitude_from_level(-15.5) * echo(things) * heard
    unlike = irfft(rfft(unlike) * magnitude_from_level(at_hz(DIFFUSE, np.fft.rfftfreq(N, 1 / SR) + 1)), N)
    unlike += (magnitude_from_level(POUR_PAN_DB) - 1) * beer
    alike = things + magnitude_from_level(-11.5) * echo(things) * heard + ringing + tone
    return ports(alike) + unlike * [[1], [-1]]


def roll_off(x):
    return signal.sosfilt(signal.butter(12, 15630, fs=SR, output="sos"), x)


def record(dry):
    t = np.arange(N) / SR
    to_cut_s = np.min([np.abs(t - s) for s in CUTS], axis=0)
    fade = np.clip(to_cut_s / 0.0067, 0.02, 1)
    held = dry / (1 + np.abs(dry / 0.85) ** 6) ** (1 / 6)
    return roll_off(held * fade)


dry = scene()
out = record(dry)
int16_out(out)
```